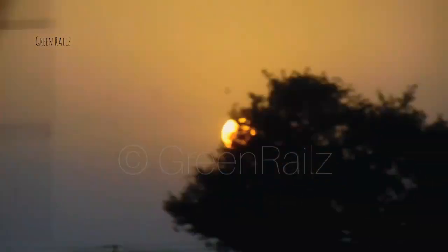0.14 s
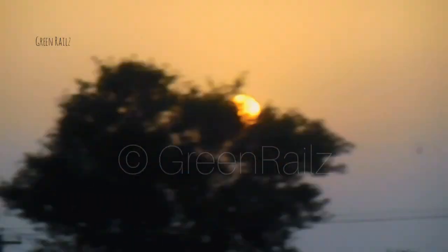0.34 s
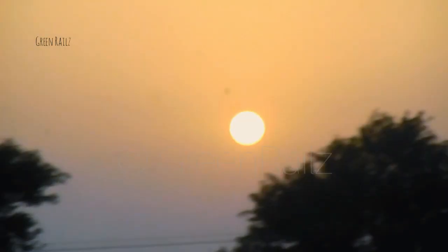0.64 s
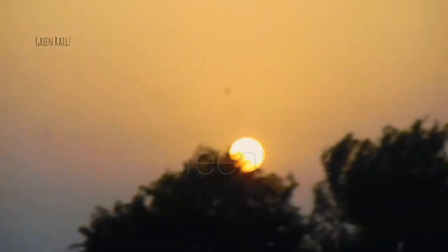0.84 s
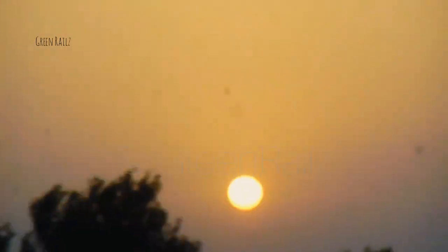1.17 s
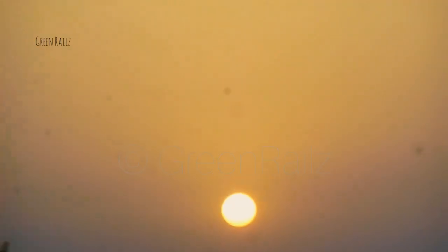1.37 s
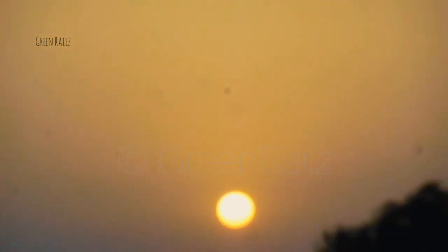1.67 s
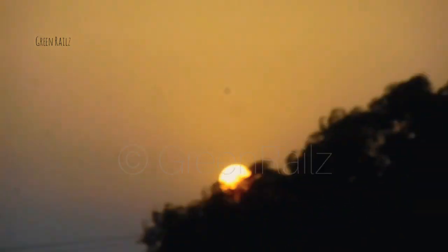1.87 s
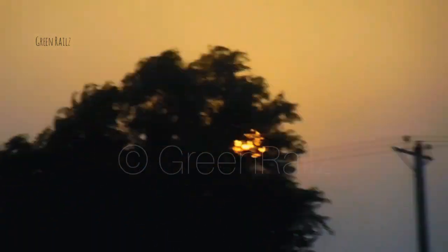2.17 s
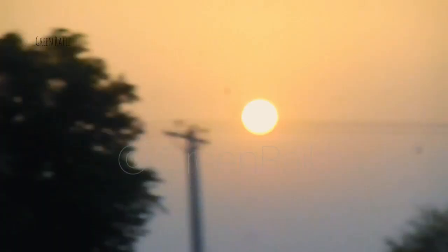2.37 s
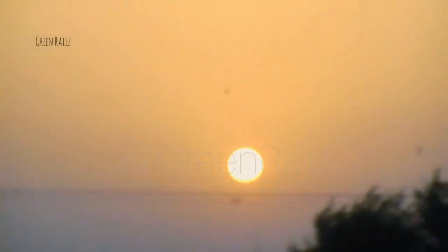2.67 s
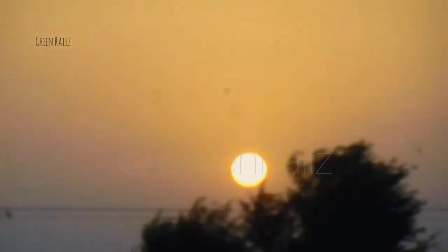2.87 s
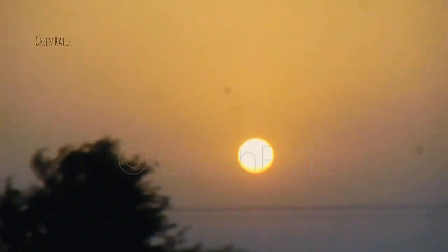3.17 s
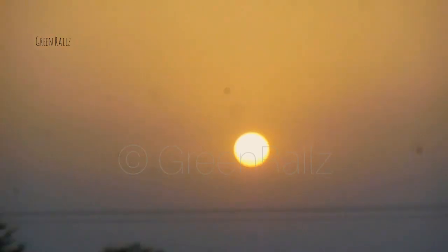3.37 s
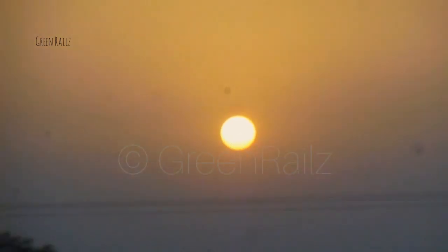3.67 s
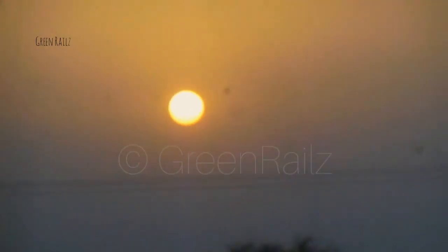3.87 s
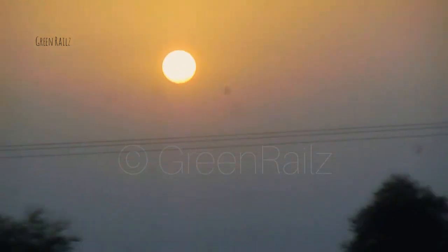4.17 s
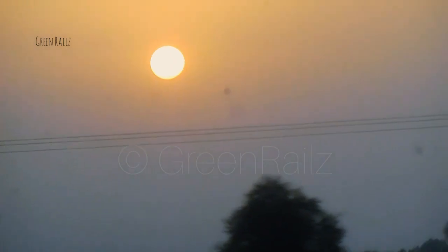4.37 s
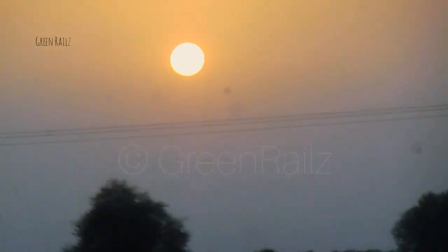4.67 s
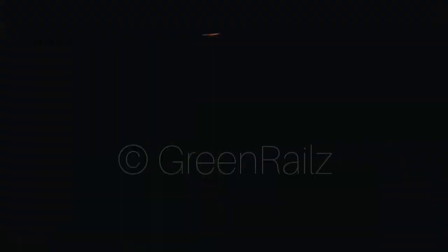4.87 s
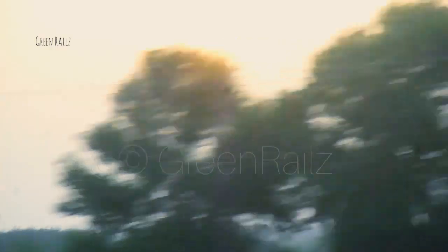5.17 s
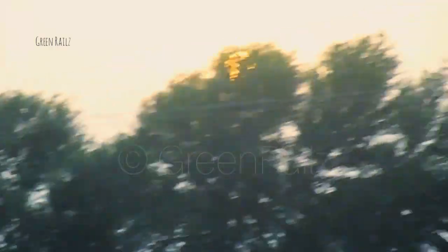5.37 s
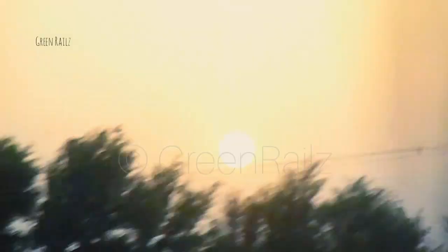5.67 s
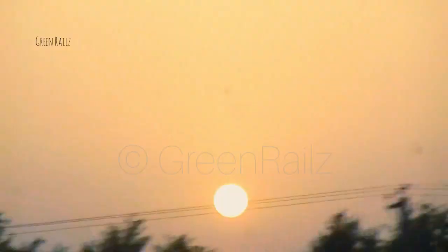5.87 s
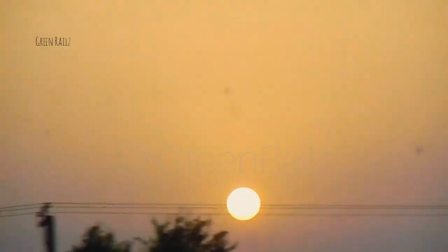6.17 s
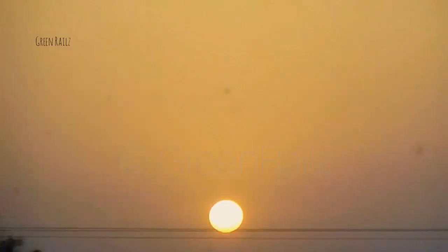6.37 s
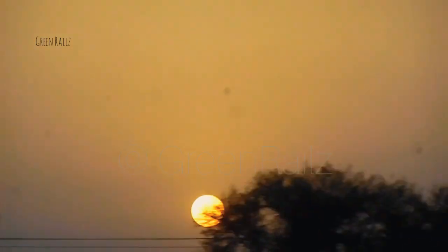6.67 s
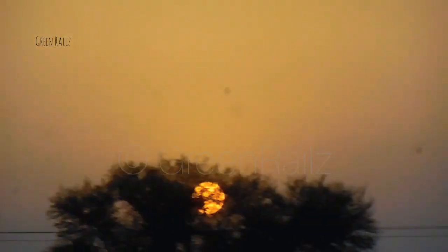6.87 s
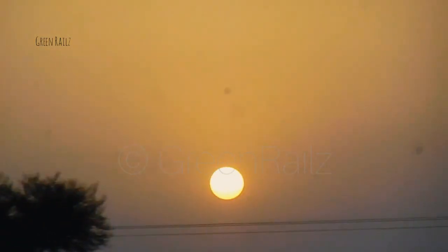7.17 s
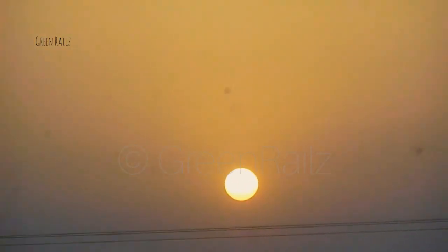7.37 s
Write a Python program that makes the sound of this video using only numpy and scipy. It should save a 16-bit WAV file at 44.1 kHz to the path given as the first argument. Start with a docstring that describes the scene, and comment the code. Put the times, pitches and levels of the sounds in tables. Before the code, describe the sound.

At the open window of a fast train, wheels roar dully through the coach body with loose fittings rattling and paired knocks over rail joints. Airy hiss swells as trees and poles pass, while low wind rumbles and eddies thump, slap and crackle on the close microphone. At the very end everything drops silent for an instant, then a harsh, clipped wind blast hits.

```python
"""Open window of a speeding train

The wheels roar through the coach body (shaped noise), loose fittings rattle, and wheels knock and squeal
(tones). Hiss swells as trees and poles go by, and is ducked after hard thumps by the recorder's gain control.
Low wind noise and eddies thump, slap and crackle on the microphone. Then the sound breaks off, and after a
moment of silence the scene changes: the full slipstream hits the microphone, noise so strong that it is
clipped."""
import sys
import numpy as np
from scipy import signal
from scipy.fft import rfft, irfft, next_fast_len
from scipy.io import wavfile
from scipy.ndimage import uniform_filter1d

SR = 44100
rng = np.random.default_rng(int(sys.argv[2]) if len(sys.argv) > 2 else 0)


def master(y):
    """Save y as 16-bit WAV."""
    cut = np.clip(np.atleast_2d(y).T, -1, 1)
    pcm = np.round(cut * 32767)  # scale
    wavfile.write(sys.argv[1], SR, pcm.astype(np.int16))


N = 332073
TIME = np.arange(N) / SR   # seconds
SILENCE_S, BLAST_S, OVERLOAD_S = 7.448, 7.483, 7.506
CUTOFF_HZ = 15600

# Wheels on rails, levels before trim: [t/s, roar level/dB, body boom level/dB]
ROLLING_LEVELS = [(0.0, -41, -36), (0.2, -48, -44.5), (0.35, -48, -41), (0.45, -40, -33.5),
                  (0.68, -38, -36.5), (1.16, -45.5, -43), (1.41, -47, -37.5), (1.6, -40.5, -38),
                  (2.1, -42.5, -38), (2.51, -41.5, -36.5), (2.67, -42.5, -37.5), (3.13, -41.5, -39.5),
                  (3.69, -42.5, -40.5), (4.02, -41, -43.5), (4.46, -32.5, -37), (4.6, -44.5, -41),
                  (4.81, -43.5, -41), (5.1, -41.5, -38.5), (5.26, -37.5, -36), (5.43, -39, -35),
                  (6.13, -40, -34), (6.42, -35.5, -27), (6.76, -32.5, -35), (6.86, -34, -25),
                  (6.91, -43.5, -37), (7.09, -45.5, -44), (7.44, -43.5, -40.5)]
# Eddies passing the microphone, levels before trim:
# [t/s, pressure swing level/dB, time from centre to swing peak/s, flutter level/dB]
EDDIES = [(0.122, -22, 0.00254, -24.5), (0.708, -17, 0.009, -25.5), (0.735, -12, 0.0056, -20.5),
          (0.77, -8, 0.0083, -25.5), (0.812, -18, .011, -46), (0.901, -5, 0.0052, -20.5),
          (1.42, -8.5, 0.009, -20.5), (1.652, -27, 0.0037, -34), (1.725, -13.5, .01, -35),
          (2.096, -14.5, 0.023, -26), (2.263, -14, 0.0075, -45), (2.307, -5.5, 0.0093, -31),
          (2.465, -15, 0.02, -27), (2.602, -11.5, 0.0054, -17), (2.634, -15.5, 0.0038, -29),
          (2.675, -8, 0.011, -22), (3.015, -15.5, 0.0054, -29.5), (3.299, -2.5, 0.0082, -15),
          (3.355, -14, 0.018, -41), (3.746, -19, 0.0099, -36), (4.201, -7.5, 0.0083, -31),
          (4.482, -19, 0.0048, -33), (4.541, -11, 0.0047, -22.5), (4.573, -1.5, 0.0054, -15),
          (4.615, -13, 0.0093, -25), (5.341, -9.5, 0.017, -31), (5.402, -21, .005, -25.5),
          (5.442, -9, 0.011, -23.5), (5.673, -21, 0.006, -25.5), (5.839, -12.5, 0.013, -28.5),
          (5.899, -11, 0.0027, -25.5), (6.162, -13, 0.014, -35), (6.388, -12.5, 0.012, -35),
          (6.512, -10, 0.0077, -23.5), (6.76, -19, 0.014, -20), (6.854, -6.5, 0.0096, -17.5),
          (6.938, -17, .007, -27), (6.99, -6, 0.0048, -17), (7.032, -9, 0.011, -26.5)]
# What a wheel knock or a rattling fitting rings with: [f/Hz, relative level/dB, time to fall 60 dB/s]
RINGING_MODES = [(283, 8.5, 0.057), (548, 6.5, 0.1), (616, -5, 0.033), (788, -3.5, 0.05), (977, 3.5, 0.039),
                 (1200, -20, 0.028), (1655, -12.5, 0.063)]


def from_db(db):
    """Turn decibels into gain."""
    return 10 ** (np.asarray(db) / 20)


def rms_one(x):
    """Scale to unit power."""
    return x / np.sqrt(np.mean(x ** 2) + 1e-20)


def in_time(rows):
    """Draw straight lines between the rows of a table, giving each column at every sample."""
    s, *columns = np.transpose(rows)
    return [np.interp(TIME, s, column) for column in columns]


def drift(rate):
    """Slow random wandering of rms 1, smoothed by two equal low-pass stages at the rate in Hz."""
    step = 40   # one slow value per 40 samples
    pole = np.exp(-2 * np.pi * rate * step / SR)
    settle = 2000   # slow values dropped while the filter settles
    white = rng.standard_normal(N // step + settle + 2)
    slow = signal.lfilter([1], [1, -2 * pole, pole * pole], white)[settle:]
    return np.interp(np.arange(N) / step, np.arange(len(slow)), rms_one(slow))


def cut(x, hz, kind, order=2):
    """Butterworth low-, high- or band-pass filter."""
    return signal.sosfilt(signal.butter(order, hz, kind, fs=SR, output="sos"), x)


def smooth_noise(colour):
    """Even noise of rms 1 whose spectrum follows the colour table and falls away below its first row."""
    points_hz, points_db = np.transpose(colour)
    size = next_fast_len(N)
    hz = np.maximum(np.fft.rfftfreq(size, 1 / SR), 1)
    gain = from_db(np.interp(np.log(hz), np.log(points_hz), points_db))
    gain *= np.minimum(hz / points_hz[0], 1) ** 2
    return rms_one(irfft(rfft(rng.standard_normal(size)) * gain, size)[:N])


def turbulence(colour, patchy_db, flicker_rate):
    """Half-octave bands of noise, each flickering by itself; rms 1 in all."""
    points_hz, points_db = np.transpose(colour)
    edges = 11 * 2 ** (np.arange(22) / 2) * 1.05
    white = rng.standard_normal((2, N + SR // 2))   # neighbouring bands use different noise
    out = 0
    for k, (low, high) in enumerate(zip(edges, edges[1:])):
        hz = np.sqrt(low * high)
        if points_hz[0] / 2 < hz < points_hz[-1] * np.sqrt(2):
            level_db = np.interp(np.log(hz), np.log(points_hz), points_db)
            band = cut(white[k % 2], [low, high], "band")[-N:]
            out = out + band * from_db(level_db + patchy_db * drift(flicker_rate))
    return rms_one(out)


def wind_rumble(level_db=2.0, steadiness=0.79, wake_db=-17, wake_s=0.07):
    """Slow pressure waves of the slipstream follow the gusts and heave around each eddy."""
    # Wind pressure on the microphone, before trim: [t/s, level/dB]
    gusts = [(0.0, -26), (0.25, -30.5), (0.5, -27.5), (0.78, -21), (1.12, -29.5), (1.55, -24.5), (1.7, -27),
             (1.87, -27.5), (2.08, -21), (2.5, -27), (2.8, -23.5), (3.13, -29.5), (3.42, -27), (3.65, -31),
             (3.84, -23.5), (4.07, -28), (4.41, -24), (4.68, -33.5), (4.95, -24.5), (5.1, -31.5),
             (5.43, -22.5), (5.93, -24.5), (6.28, -23), (6.8, -24), (7.02, -26.5), (7.19, -27.5),
             (7.44, -31)]
    # Spectrum of the wind: [f/Hz, relative level per Hz/dB]
    wind_colour = [(12, 7.5), (22, -1), (40, -11), (70, -16), (120, -28), (250, -34), (600, -83)]
    level, = in_time(gusts)
    wakes = sum(from_db(push_db + wake_db) * np.exp(-((TIME - s) / wake_s) ** 2)
                for s, push_db, *_ in EDDIES)
    waves = turbulence(wind_colour, patchy_db=1.0, flicker_rate=11)
    power = uniform_filter1d(waves ** 2, size=SR // 10) + 1e-6
    steadied = waves / power ** (steadiness / 2)   # partly evens out the noise's own swells
    return np.hypot(from_db(level + level_db), wakes) * steadied


def rolling(roar_db=0.0, boom_db=1.0, uneven_db=0.26):
    """Rough rails make the wheels roar and the body boom, both shaken by the same jolts."""
    # Spectra of the wheels and of the coach body: [f/Hz, relative level per Hz/dB]
    roar_colour = [(150, -4), (300, -1.5), (480, 1), (750, -6.5), (1000, -11), (1300, -16), (2000, -19.5),
                   (4000, -40.5)]
    boom_colour = [(50, -1), (90, 1), (150, 0.5), (280, -1.5), (380, -21), (700, -41)]
    roar, boom = in_time(ROLLING_LEVELS)
    jolts_db = uneven_db * drift(rate=10.7)
    wheels = from_db(roar + roar_db) * turbulence(roar_colour, patchy_db=2.5, flicker_rate=48)
    body = from_db(boom + boom_db) * turbulence(boom_colour, patchy_db=1.25, flicker_rate=36)
    return (wheels + body) * from_db(jolts_db)


def rushing_air(level_db=2.5, bright_db=-1.85, split_hz=5200, shake_db=0.9, top_shake_db=0.5):
    """Broad, slightly shaking hiss whose top opens as its level rises and as things pass close by."""
    # Hiss level before trim, swelling, and ducked after hard thumps by the recorder's gain control:
    # [t/s, level/dB]
    hiss_levels = [(0.06, -50.5), (0.18, -52), (0.35, -50.5), (0.55, -44), (0.72, -43.5), (1.17, -49.5),
                   (1.5, -47.5), (1.83, -50.5), (2.14, -42.5), (2.46, -47), (2.57, -45), (2.69, -50),
                   (3.16, -50.5), (3.24, -46.5), (3.3, -49.5), (3.32, -54), (3.4, -51.5), (3.94, -52),
                   (4.4, -46), (4.562, -45.5), (4.583, -50), (4.72, -51.5), (5.05, -53), (5.36, -46),
                   (5.49, -49.3), (5.9, -47.8), (6.36, -44), (6.6, -44), (6.74, -40.5), (6.852, -44),
                   (6.872, -47.5), (6.92, -48), (6.98, -45.5), (7.0, -52.5), (7.44, -50.7)]
    # Spectrum of the hiss: [f/Hz, relative level per Hz/dB]
    hiss_colour = [(200, -0.5), (500, 5), (1000, 1), (1900, -1.5), (3100, -2), (3900, -5), (5200, -7),
                   (6400, -11.5), (9500, -15), (12500, -20), (14500, -25), (15700, -28)]
    # Something close to the track throws back the top of the hiss as it passes:
    # [t/s, level against the direct hiss before the top is trimmed/dB, half length/s, lower edge f/Hz]
    passing_things = [(0.47, -1, .02, 7000), (0.776, -1, .025, 6000), (0.922, -3, 0.14, 7000),
                      (2.136, -6, .05, 4200), (2.223, 0.5, 0.14, 6500), (2.506, 2, .035, 8000),
                      (2.94, -3, 0.16, 4500), (3.238, -2, .025, 7000), (3.68, -2, .03, 7000),
                      (4.553, 4, .018, 6500), (6.655, 0, .03, 8500), (6.712, 5, 0.038, 8200),
                      (7.27, 2, 0.25, 7500)]
    top_follows = 0.19   # dB of extra treble for each dB that the hiss level rises
    level, = in_time(hiss_levels)
    brightness = bright_db + top_follows * (level - level.mean())
    hiss, thrown_back = smooth_noise(hiss_colour), smooth_noise(hiss_colour)
    low = cut(cut(hiss, split_hz, "low"), split_hz, "low")
    top = cut(cut(hiss, split_hz, "high"), split_hz, "high")
    for s, lift_db, half_s, edge_hz in passing_things:
        nearness = np.exp(-((TIME - s) / half_s) ** 2)
        top += from_db(lift_db) * nearness * cut(thrown_back, edge_hz, "high", order=4)
    top = top * from_db(brightness + top_shake_db * drift(rate=40))
    return from_db(level + level_db + shake_db * drift(rate=18)) * (low + top)


def shifting_colour(x, copy_gain=0.23, lag_s=0.002, wander=0.199):
    """A faint delayed copy with wandering lag keeps shifting the colour of the hiss."""
    lag = lag_s * np.exp(wander * drift(rate=1.84))   # seconds, wandering around lag_s
    delayed = np.interp(TIME - lag, TIME, x)
    return (x + copy_gain * delayed) / np.sqrt(1 + copy_gain ** 2)


def coach(x):
    """Wheels and coach body resonate in narrow bands and leave hollows in a few others."""
    # Resonances (positive) and hollows (negative): [f/Hz, width/Hz, lift/dB]
    body_bands = [(280, 26, 7), (352, 40, -2), (510, 80, 2), (960, 110, 3), (1058, 14, 5), (1455, 30, 3),
                  (1558, 18, 4), (1850, 140, -2), (2280, 35, 2), (2600, 25, 3), (2870, 25, 3),
                  (3170, 200, 3), (3420, 90, -2), (3730, 130, 2), (4620, 220, 1.5)]
    for hz, width_hz, lift_db in body_bands:
        band = signal.lfilter(*signal.iirpeak(hz, hz / width_hz, fs=SR), x)
        x = x + (from_db(lift_db) - 1) * band
    return x


def rattle(per_s=70, size_db=12.5, level_db=-9.5):
    """Loose fittings chatter at random and ring, louder when the wheels roar."""
    roar, _ = in_time(ROLLING_LEVELS)
    sizes_db = size_db * np.minimum(rng.exponential(1, N), 2)
    taps = (rng.random(N) < per_s / SR) * from_db(sizes_db)
    out = 0
    for hz, mode_db, t60 in RINGING_MODES:
        decay = from_db(-60 / (t60 * SR))   # gain kept per sample
        turn = 2 * np.pi * hz / SR   # radians per sample
        # Each tap meets each mode with its own strength; the tiny offset avoids slow arithmetic.
        strikes = taps * rng.standard_normal(N) + 1e-18
        ringing = signal.lfilter([0, np.sin(turn)], [1, -2 * decay * np.cos(turn), decay ** 2], strikes)
        out = out + from_db(mode_db) * ringing
    return from_db(roar + level_db) * rms_one(out)


def buffets(swing_db=-0.5, flutter_db=1.5, sharp_db=-9.5, split_hz=430, top_hz=2500):
    """Each eddy pushes then pulls on the microphone, and its core breaks into a short rough flutter."""
    # Spectrum of the flutter: [f/Hz, relative level per Hz/dB]
    flutter_colour = [(40, 14), (90, 0), (170, -3), (300, -8.5), (600, -9), (1100, -34), (2200, -38),
                      (5000, -44)]
    flutter_s, flutter_grows = 0.012, 0.98   # half length: seconds plus a share of the swing width
    flutter = smooth_noise(flutter_colour)
    dull, sharp = cut(flutter, [80, split_hz], "band"), cut(flutter, [split_hz, top_hz], "band")
    out = np.zeros(N)
    for s, push_db, push_width, rough_db in EDDIES:
        centre = round(s * SR)
        near = slice(max(centre - SR // 8, 0), centre + SR // 6)
        age = TIME[near] - s
        passing = age / max(push_width, .002)
        swing = -passing * np.exp((1 - passing ** 2) / 2)
        out[near] += from_db(push_db + swing_db) * swing
        envelope = np.exp(-(age / (flutter_s + flutter_grows * push_width)) ** 2)
        for noise, level_db in (dull, flutter_db), (sharp, sharp_db):
            burst = envelope * noise[near]
            # Luck in the noise must not change the energy: the eddy's strength sets it.
            burst *= np.sqrt(np.sum(envelope ** 2) / np.sum(burst ** 2))
            out[near] += from_db(rough_db + level_db) * burst
    return out


def slaps(rows):
    """The edge of an eddy lands as a spike of pressure that dies within a few cycles."""
    out = np.zeros(N)
    t = TIME[:SR // 50]
    for s, peak_db, hz, cycles in rows:
        age = hz * t / cycles   # 1 at the peak of the envelope
        spike = age * np.exp(1 - age) * np.sin(2 * np.pi * hz * t)
        start = round(s * SR)
        out[start:start + len(t)] += from_db(peak_db) * spike
    return out


def crackle(level_db=-11.5, scatter_db=2.5, spread=1.2, low_hz=350, high_hz=1200, cycles=0.5, count=5):
    """Small swirls in the core of each eddy pop on the microphone; the high ones tend to be fainter."""
    pops = []
    for s, _, width_s, rough_db in EDDIES:
        for late, height, luck in rng.uniform(-1.1, 1, (count, 3)):
            hz = low_hz * (high_hz / low_hz) ** ((height + 1) / 2)
            pop_db = rough_db + level_db + scatter_db * (luck - height)
            pops.append((s + spread * width_s * late, pop_db, hz, cycles))
    return slaps(pops)


def knocks(crunch_db=-2.5, ring_db=-13.0, scatter_db=2.5):
    """A wheel crunches over a flaw in the rail and rings each mode with a new strength."""
    # Wheel knocks, mostly in pairs as the two axles of a bogie pass, before trim:
    # [t/s, level/dB, brightness/dB per octave]
    wheel_hits = [(0.423, -37, 6), (0.523, -24, 3), (1.38, -30, 6), (1.487, -28.5, 0), (1.861, -30, 3),
                  (1.963, -27, -4), (2.408, -31, -12), (2.442, -36, 0), (2.818, -31, 3), (2.913, -26, 1),
                  (3.02, -30, 0), (3.122, -31.5, -2), (3.402, -33.5, 11), (4.351, -24, -2),
                  (4.704, -30.5, -6), (4.829, -29, 3), (4.976, -30.5, -4), (5.754, -26.5, -0.5),
                  (5.852, -22, 0), (6.158, -23, -2), (6.265, -25.5, -1), (6.371, -24, -7), (6.469, -30, -9),
                  (7.112, -31.5, 0), (7.215, -30, -2)]
    # Spectrum of the rough contact: [f/Hz, relative level per Hz/dB]
    crunch_colour = [(170, 6.5), (300, 2.5), (540, 2), (800, -5.5), (1050, -7.5), (1400, -17), (2000, -20),
                     (3500, -30), (6000, -52), (12000, -85)]
    attack_s, decay_s = 0.002, 0.025   # time constants of the rough contact
    pivot_hz = 550   # brightness tilts the modes around this pitch
    out = np.zeros(N)
    t = TIME[:SR // 4]
    hz, mode_db, t60 = np.transpose(RINGING_MODES)[:, :, None]
    grit = smooth_noise(crunch_colour)
    contact = (1 - np.exp(-t / attack_s)) * np.exp(-t / decay_s)
    for s, level_db, tilt_db in wheel_hits:
        colour_db = mode_db + tilt_db * np.log2(hz / pivot_hz)
        strength = from_db(colour_db + scatter_db * rng.standard_normal(hz.shape))
        strength = strength * rng.choice([-1, 1], hz.shape)
        fading = np.exp(-np.log(1000) * t / t60)
        ring = np.sum(strength * np.sin(2 * np.pi * hz * t) * fading, axis=0)
        start = round(s * SR)
        near = slice(start, start + len(t))
        crunch = rms_one(contact * grit[near]) * np.sqrt(np.mean(contact ** 2))
        out[near] += from_db(level_db + crunch_db) * crunch + from_db(level_db + ring_db) * ring
    return out


def swelling_tones(rows, waver):
    """A resonance is driven for a moment: its wavering tone swells and fades."""
    clock = np.cumsum(1 + waver * drift(rate=42.5)) / SR   # seconds, running unevenly
    return sum(from_db(level_db) * np.exp(-((TIME - s) / half_s) ** 2) * np.sin(2 * np.pi * hz * clock)
               for s, half_s, hz, level_db in rows)


def clicks(rows):
    """One single-sample impulse per row of time and level."""
    out = np.zeros(N)
    for s, level_db in rows:
        out[round(s * SR)] = from_db(level_db)
    return out + 1e-18   # the tiny offset avoids slow arithmetic in filters


def ticks(level_db=17.0, low_hz=900, soft_hz=4500):
    """Thin bright ticks: impulses with the bass removed and the top softened."""
    # Thin bright ticks: [t/s, impulse level before filters and trim/dB]
    tick_times = [(0.9124, -33), (3.289, -39), (3.299, -29), (3.3097, -30), (6.8617, -32), (6.8728, -36),
                  (6.9897, -30)]
    thin = cut(clicks(tick_times), low_hz, "high", order=1)
    return from_db(level_db) * cut(thin, soft_hz, "low", order=1)


def slipstream(first_db=-14.5, full_db=2.5, push_db=-3.0, push_s=0.0032, side_db=-25.0, side_hz=3800):
    """The airstream lands with a push, then rises into overload; its top differs between the ears."""
    # Spectrum of the blast: [f/Hz, relative level per Hz/dB]
    blast_colour = [(25, 6), (90, -4.5), (280, -9), (500, -16), (850, -11), (1400, -20), (2200, -17),
                    (4500, -20), (9000, -29.5), (15000, -38)]
    blast = smooth_noise(blast_colour)
    blast /= np.sqrt(uniform_filter1d(blast ** 2, size=SR // 40))   # a steady flow of air
    side = from_db(side_db) * rms_one(cut(smooth_noise(blast_colour), side_hz, "high", order=6))
    level_db = np.interp(TIME, [OVERLOAD_S - .002, OVERLOAD_S], [first_db, full_db])
    push = from_db(push_db) * np.exp(-np.abs(TIME - BLAST_S) / push_s)
    both_ears = np.stack([blast + side, blast - side])
    return (both_ears * from_db(level_db) - push) * (TIME > BLAST_S)


def scene():
    """Train and wind are heard alike in both ears until the slipstream takes over."""
    # Faint squeals, as of a wheel flange: [t/s, half length/s, f/Hz, level/dB]
    squeals = [(0.9, 0.015, 1590, -42), (1.69, 0.036, 1450, -47), (2.57, .09, 2275, -49),
               (5.13, .012, 2450, -46), (5.322, 0.017, 1410, -40), (6.38, .02, 1690, -42)]
    # The coach body booms briefly: [t/s, half length/s, f/Hz, level/dB]
    body_booms = [(1.881, 0.024, 269, -28.5), (2.0, .025, 291, -32.5), (2.975, 0.014, 255, -31.5),
                  (3.178, 0.018, 279, -26.5), (3.27, 0.026, 282, -31), (3.422, 0.014, 258, -37)]
    # The sharpest eddies land with a slap: [t/s, envelope peak/dB, f/Hz, cycles to the envelope peak]
    sharp_slaps = [(0.117, -30, 640, 0.23), (0.704, -14.5, 760, 0.29), (0.715, -15.5, 600, 0.5),
                   (0.725, -18, 394, 0.56), (0.733, -16.5, 380, 0.46), (0.747, -19, 458, 0.25),
                   (0.751, -24, 800, 0.38), (1.42, -22.5, 354, 0.5), (2.6, -25, 1600, 0.5),
                   (2.604, -15, 590, 0.57), (2.607, -21, 1060, 0.41), (2.661, -22.5, 380, .6),
                   (2.689, -22, 380, 0.35), (3.29, -17, 330, 0.39), (3.301, -21, 690, 0.26),
                   (3.311, -17, 395, 0.32), (4.564, -15.5, 600, 0.29), (4.571, -17, 600, 0.4),
                   (4.577, -11, 470, .45), (4.5773, -26, 2600, .35), (5.437, -19, 480, .35),
                   (5.451, -17.5, 475, 0.5), (6.985, -23, 1160, 1.2), (6.999, -24, 453, 0.51),
                   (7.026, -26, 570, 1.2), (7.028, -32, 870, 1.6)]
    tones = swelling_tones(squeals, waver=0.0095) + swelling_tones(body_booms, waver=0.016)
    train = coach(rolling() + shifting_colour(rushing_air())) + knocks() + rattle() + tones
    wind = wind_rumble() + buffets() + slaps(sharp_slaps) + crackle() + ticks()
    audible = np.interp(TIME, [SILENCE_S - .003, SILENCE_S + .001], [1, 0])
    return (train + wind) * audible + slipstream()


def record(dry):
    """The loudest swings flatten just below full scale, then a steep filter cuts the top."""
    flattened = np.clip(dry, -.97, .97)
    steep = signal.ellip(12, .1, 95, CUTOFF_HZ, fs=SR, output="sos")
    return signal.sosfilt(steep, flattened)


dry = scene()
out = record(dry)
master(out)
```